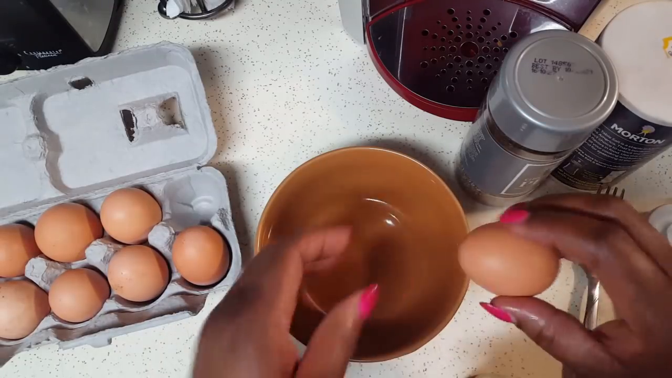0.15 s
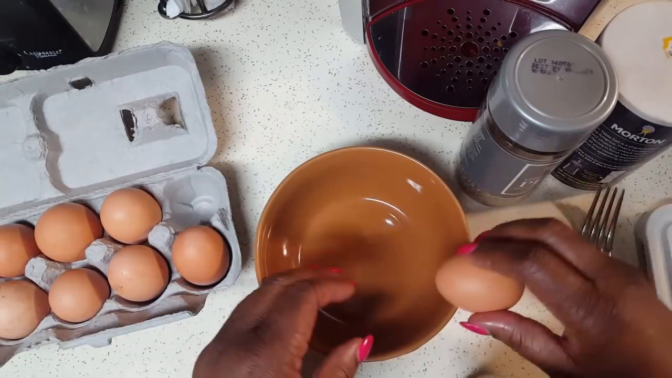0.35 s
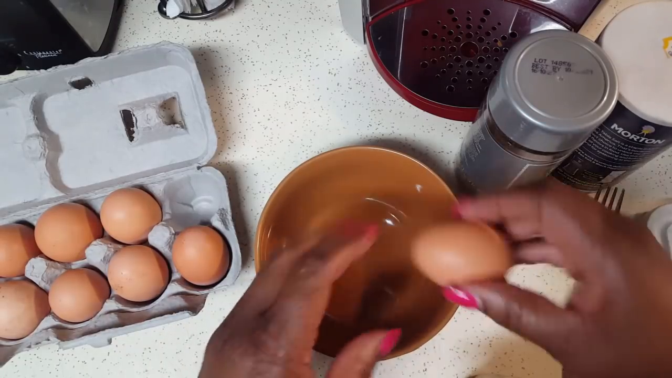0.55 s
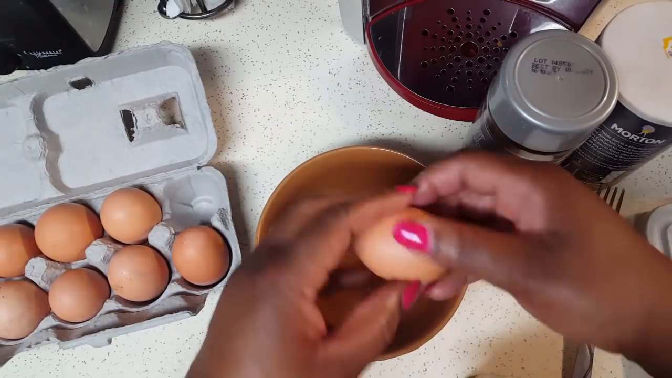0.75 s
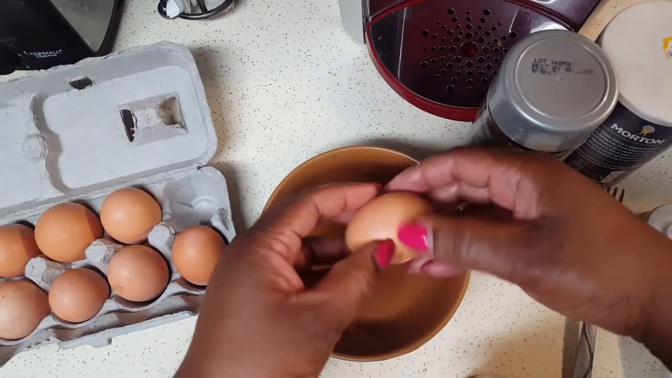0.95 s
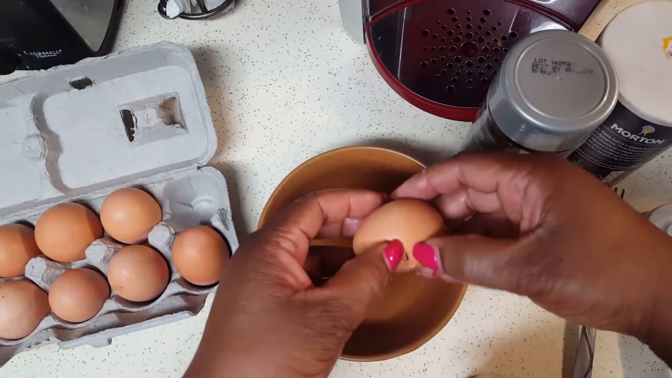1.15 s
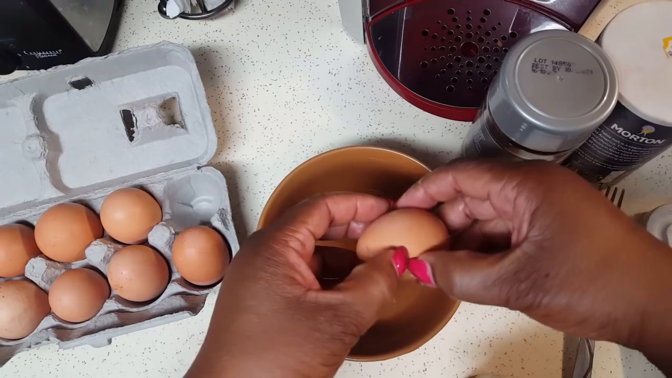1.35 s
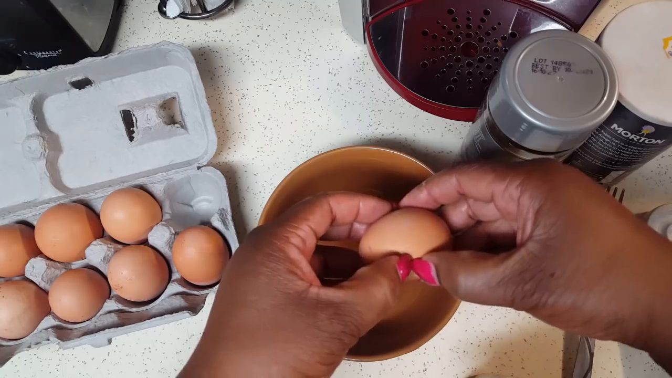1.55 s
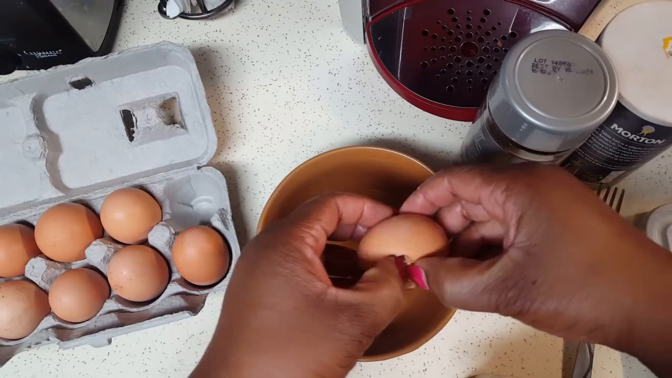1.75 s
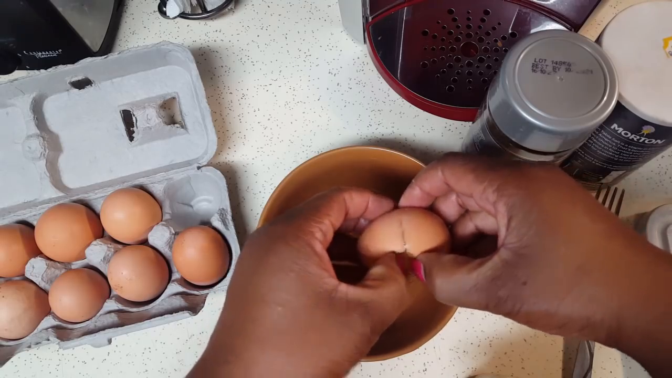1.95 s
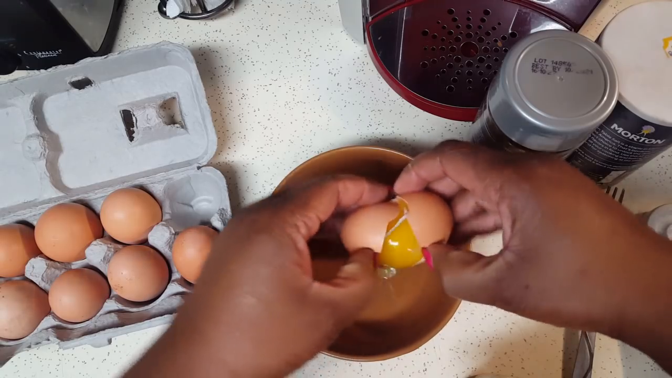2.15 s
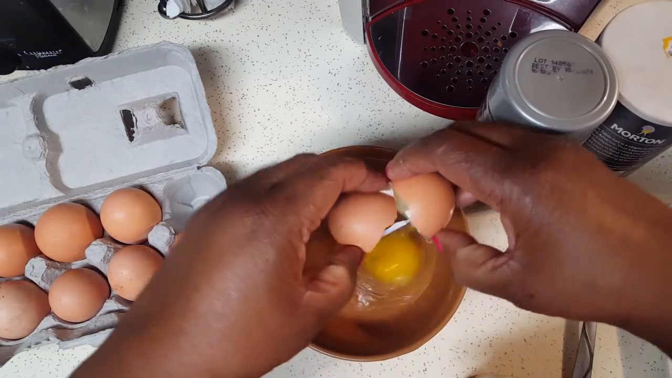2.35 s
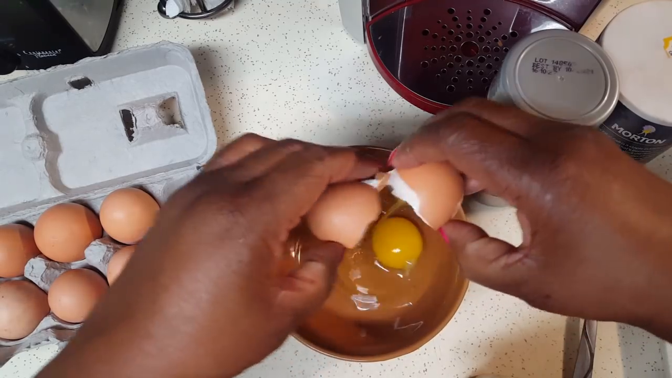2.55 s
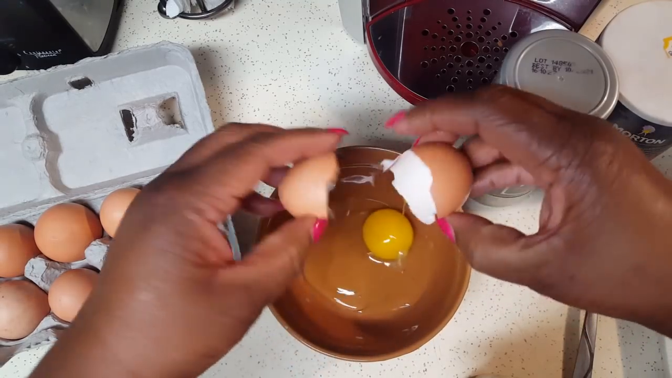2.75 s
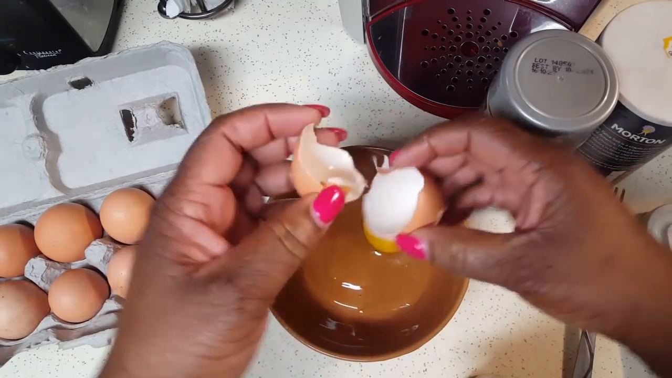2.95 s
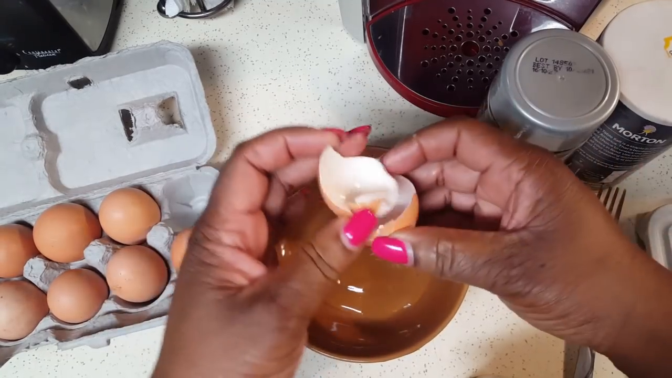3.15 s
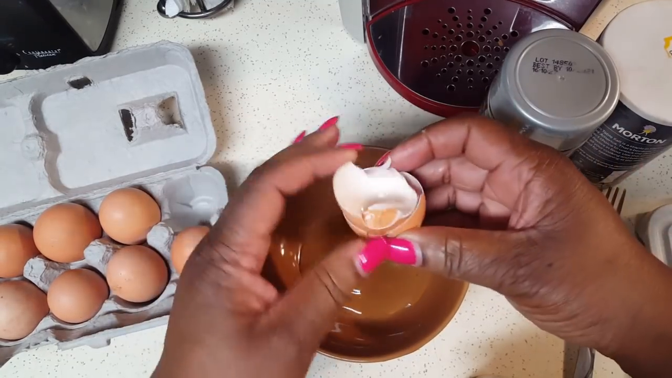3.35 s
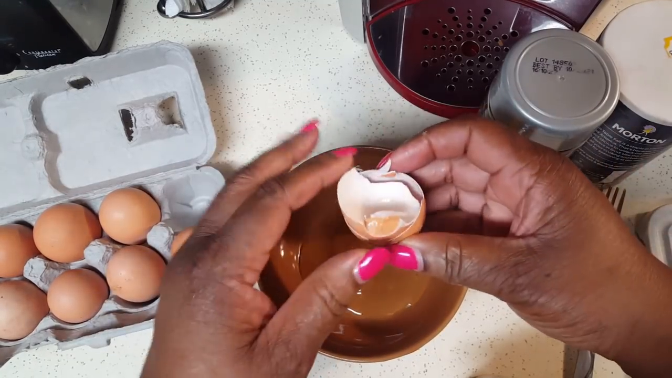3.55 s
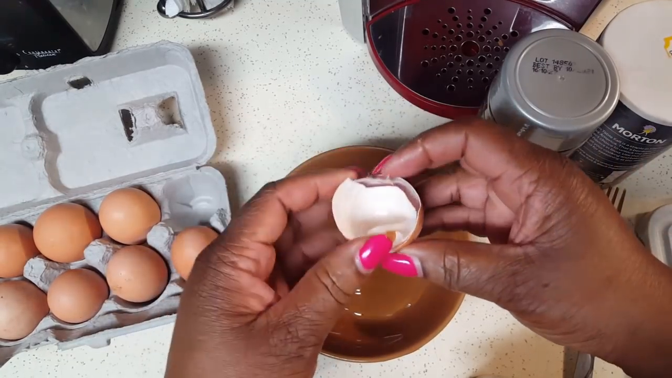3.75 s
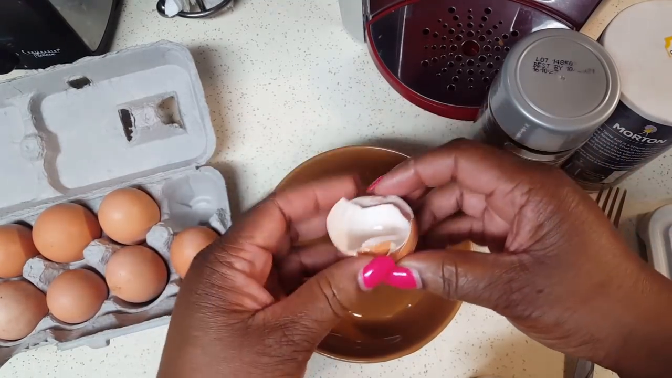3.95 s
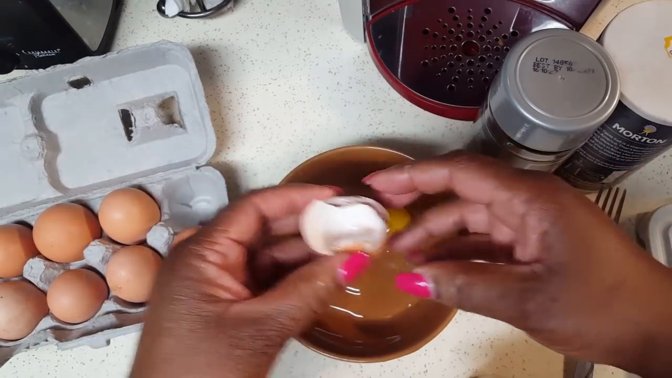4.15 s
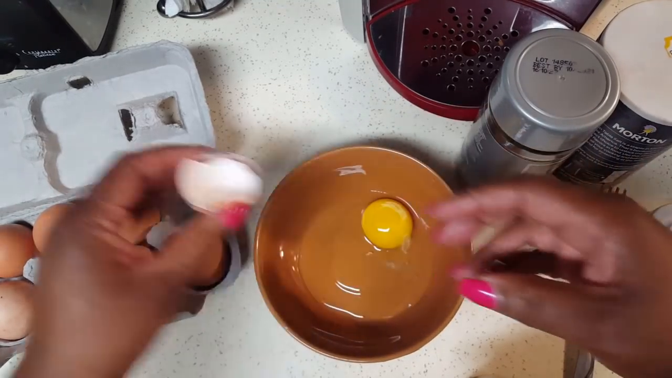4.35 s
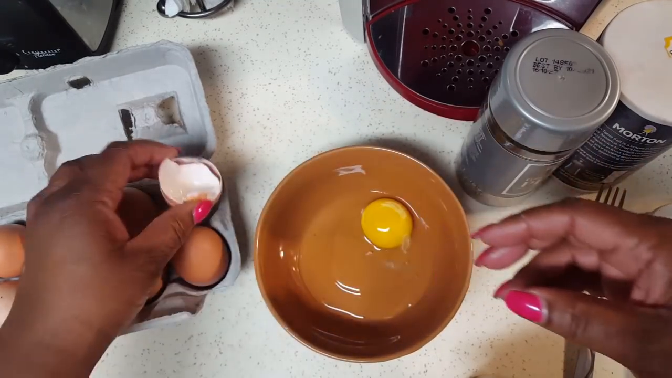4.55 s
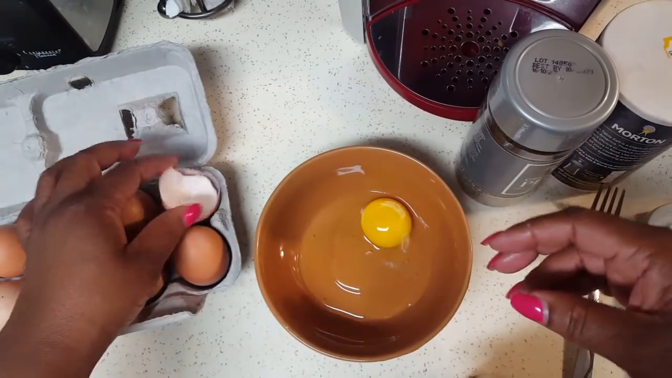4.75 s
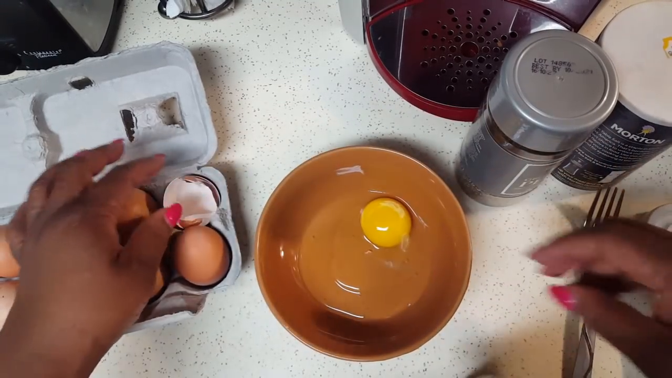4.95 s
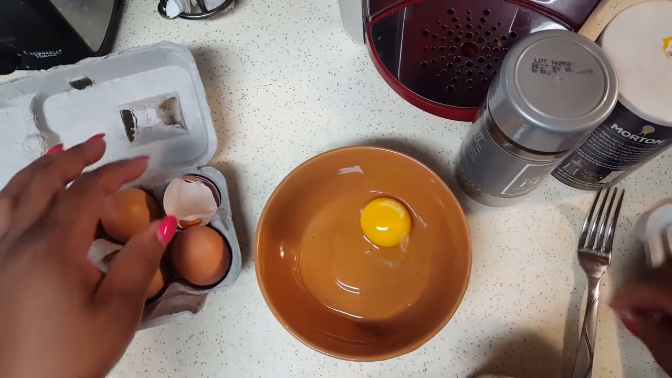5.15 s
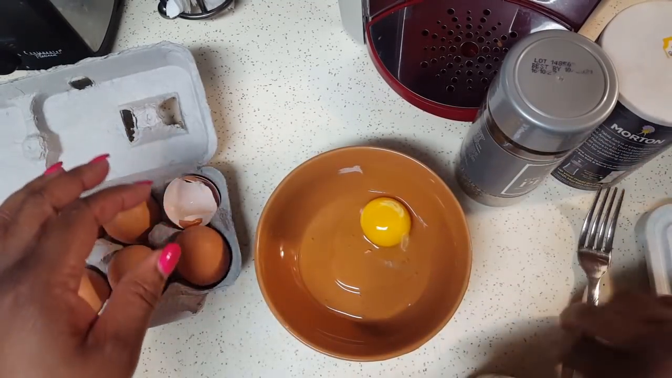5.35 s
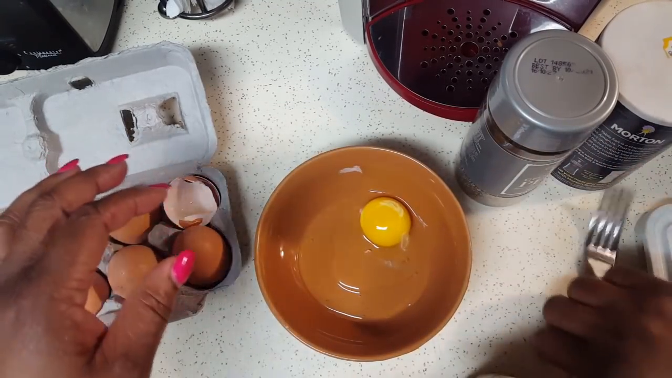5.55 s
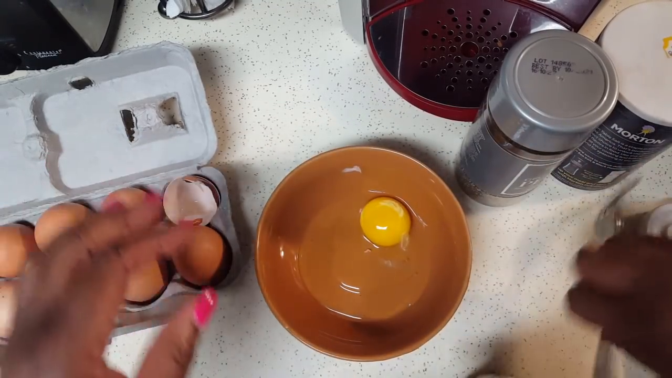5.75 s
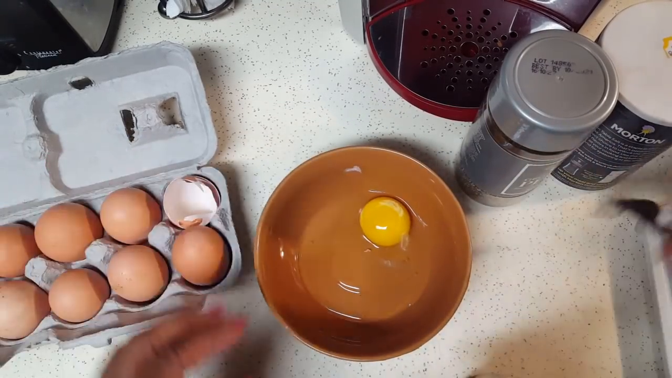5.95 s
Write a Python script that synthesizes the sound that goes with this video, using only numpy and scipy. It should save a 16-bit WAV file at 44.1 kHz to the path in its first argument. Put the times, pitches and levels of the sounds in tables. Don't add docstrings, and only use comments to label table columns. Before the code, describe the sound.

Close up in a small humming kitchen: egg knocked on a bowl, shell splitting, shells nested and dropped into a carton, fork jingling.

```python
import sys
import numpy as np
from scipy import signal
from scipy.fft import rfft, irfft, next_fast_len
from scipy.io import wavfile
from scipy.ndimage import uniform_filter1d, map_coordinates

SR = 44100
rng = np.random.default_rng(int(sys.argv[2]) if len(sys.argv) > 2 else 0)


def put_to_file(sound):
    columns = np.atleast_2d(sound).T
    safe = np.clip(columns, -1, 1)
    whole_steps = np.round(safe * 32767)
    wavfile.write(sys.argv[1], SR, whole_steps.astype(np.int16))


def natural_amplitude(level_db):
    exponent = np.asarray(level_db, float) / 20
    return 10 ** exponent


N = 265041


def evened(x):
    return x / np.sqrt(np.mean(x ** 2) + 1e-20)


def peaked(x):
    return x / np.max(abs(x))


def read(points, hz):
    f, value = np.transpose(points)
    return np.interp(np.log(hz + 1), np.log(f + 1), value)


def add(mix, s, sound):
    part = mix[..., round(s * SR):][..., :sound.shape[-1]]
    part += sound[..., :part.shape[-1]]


def resonate(x, hz, width):
    r = np.exp(-np.pi * width / SR)
    return signal.lfilter([1, 0, -1], [1, -2 * r * np.cos(2 * np.pi * hz / SR), r * r], x)


def band(x, lo_hz, hi_hz):
    return signal.sosfilt(signal.butter(2, [lo_hz, hi_hz], "band", fs=SR, output="sos"), x)


def grit(count, spread_db):
    sign, size = rng.standard_normal(count), rng.exponential(1, count)
    return sign * natural_amplitude(spread_db * np.minimum(size, 5))


def ring(modes, longest, flutter_db):
    t = np.arange(SR // 2) / SR
    flutter = uniform_filter1d(rng.standard_normal((len(modes), len(t))), 500)
    swing = [natural_amplitude(db - 60 * t / min(t60, longest)) * np.sin(2 * np.pi * hz * t) for hz, db, t60 in modes]
    return peaked(np.sum(swing * natural_amplitude(flutter_db * evened(flutter)), axis=0))


def snap(db, hz, treble_db, broad_db, crumble, cycles=17, swell=0.):
    count = 3000
    t = np.arange(count) / SR
    drive = peaked(grit(count, spread_db=-0.5) * np.exp(-t / max(crumble, 2e-4)))
    if swell:
        drive *= np.minimum(t / swell, 1) ** 2 * np.exp(np.minimum(t, swell) / crumble)
    else:
        drive[:2] += .7
    click = np.linalg.norm(drive) * (np.arange(count) == round(swell * SR))
    drive = np.array([drive, click])
    body = resonate(resonate(drive, hz, 1.82 * hz / cycles), hz, 0.73 * hz)

    def matched(x):
        return x / np.linalg.norm(x, axis=1)[:, None] * np.linalg.norm(peaked(x[0]))

    middle = matched(body) + natural_amplitude(broad_db) * matched(band(drive, 1200, 5600))
    treble = matched(band(drive, 5139, 14500))
    return natural_amplitude(db) * (middle / np.max(abs(middle[0])) + natural_amplitude(treble_db) * treble)


def stroke(rows):
    s, *columns = np.transpose(rows)
    t = np.arange(s[0], s[-1], 1 / SR)
    return s[0], signal.windows.tukey(len(t), .08), [np.interp(t, s, c) for c in columns]


# (frequency [Hz], density [dB per Hz])
AIR = [(15, -65), (34, -44), (40, -17), (58, -8.5), (92, -17), (114, -8.5), (209, -3.5), (296, -6.5),
       (320, -18.5), (356, 0.5), (386, -13), (517, -12), (674, -17), (730, -13.5), (1540, -28),
       (14500, -36.5), (14700, -60.5)]
# (frequency [Hz], likeness [0-1])
AIR_SAME = [(60, 0.92), (240, 0.833), (950, 0.29), (3770, 0.024), (15000, 0.067)]
# (frequency [Hz], left minus right [dB])
AIR_LEFT = [(60, 1.5), (950, 3), (15000, -0.5)]
# (frequency [Hz], level [dB])
HUM = [(59.2, -70.5), (118.4, -66.5), (215.3, -61), (258.4, -66.5), (296.1, -64.5), (355.3, -60.5),
       (414.5, -69), (473.7, -70), (522.2, -68.5), (888.2, -75.5)]


def air():
    frames, hz = N // 512 + 5, np.fft.rfftfreq(2048, 1 / SR)
    a, b, c, d = rng.standard_normal((frames, 1025, 4)).T
    same = np.clip(read(AIR_SAME, hz), -1, 1)[:, None]
    left, other = a + 1j * b, c + 1j * d
    z = np.array([left, same * left + np.sqrt(1 - same ** 2) * other])
    sides = np.array([.5, -.5])[:, None, None]
    z *= natural_amplitude(read(AIR, hz)[:, None] + read(AIR_LEFT, hz)[:, None] * sides)
    wash = natural_amplitude(-54.5) * evened(signal.istft(z, nperseg=2048, noverlap=1536)[1][:, :N])
    t = np.arange(N) / SR
    waver = uniform_filter1d(rng.standard_normal((len(HUM), N)), 6000)
    for (hum_hz, db), w in zip(HUM, waver):
        wash += natural_amplitude(db + 3 + 1.3 * evened(w)) * np.sin(2 * np.pi * (hum_hz * t + rng.random()))
    return wash


# (time [s], level [dB], relative treble [dB])
RUSTLE = [
    [(0.28, -78.5, 5), (0.35, -72.5, 12), (0.41, -82, 8)],
    [(1.04, -74.5, 3), (1.084, -56, -3), (1.11, -67, -4)],
    [(1.385, -68, -2), (1.409, -55.5, 10), (1.45, -75, -1)],
    [(4.775, -55, -18), (4.84, -55.5, -14), (4.94, -45, -13.5), (5.15, -72, -19)],
    [(4.868, -62, 0), (4.888, -45, -6), (4.92, -56, -6)],
    [(1.7, -61, 0), (1.84, -62.5, -3), (2.0, -73, -2)],
    [(5.52, -59.5, 5), (5.706, -60, -26), (5.74, -37, -12)],
    [(5.745, -44, 11), (5.79, -56, 7), (6.0, -65, 12)],
]


def rustles(near):
    for rows in RUSTLE:
        s, fade, (db, treble_db) = stroke(rows)
        drive = grit(len(db), spread_db=-0.5)
        fibres = evened(band(drive, 1050, 2665)) + natural_amplitude(treble_db) * evened(band(drive, 4480, 15000))
        add(near, s, natural_amplitude(db - 7) * fade * fibres)


# (frequency [Hz], width [Hz], level [dB])
COUNTER = [(108, 51.6, -7.5), (323, 59, 3), (570, 200, -5), (724, 48, -8), (880, 99, -12.5),
           (1120, 110, -6.5)]


def thud(db, t60, top_hz, low_hz=85):
    t = np.arange(SR // 2) / SR
    drive = rng.standard_normal(len(t)) * natural_amplitude(-60 * t / t60) * np.minimum(t / 0.00095, 1)
    modes = sum(natural_amplitude(level_db) * np.sqrt(width) * resonate(drive, hz, width) / hz
                for hz, width, level_db in COUNTER)
    boom = peaked(band(modes, low_hz, 1.17 * top_hz))
    rattle = peaked(band(drive, 229.6, top_hz))
    return natural_amplitude(db) * peaked(boom + natural_amplitude(-3) * rattle)


# (time [s], peak [dB])
BLOW = [
    (0.4536, -7),
    (0.4545, -3),
]
# (frequency [Hz], level [dB], t60 [s])
BOWL = [(1141, -17, .24), (1389, 0, .26), (1384, -10, .43), (1728, -23, .26), (2078, -26, .3),
        (3136, -13, .25), (3141, -22, .6), (5448, -28, .36), (556, -8, .25), (880, -9, .25),
        (917, -11, .22), (731, -12, .3), (5825, -29, .15)]


def blow(near, rim):
    (crackle_s, crackle_db), (land_s, land_db) = BLOW
    add(near, crackle_s, snap(crackle_db - 5.5, 3000, 9, 3, .0013))
    add(near, land_s, snap(land_db - 3, 1700, -9, -5, .0006, 9))
    add(near, land_s, thud(land_db - 5, 0.13, 1500, low_hz=150))
    bowl = natural_amplitude(land_db - 7) * ring(BOWL, longest=1, flutter_db=.6)
    add(near[1], land_s, natural_amplitude(-14) * bowl)
    add(rim, land_s, np.array([bowl, np.roll(bowl, 9)]))


# (time [s], peak [dB], ring [Hz], relative treble [dB])
SNAPS = [(0.8612, -38, 1460, -1.5), (.936, -51, 2477, -1), (1.431, -46, 1420, 9.5), (1.734, -41, 1340, -13),
         (1.774, -52, 2460, 9), (1.8503, -23, 1840, 6), (2.0, -43, 3440, 6), (2.2207, -43, 4690, 5),
         (2.3627, -23.5, 1910, -7.5), (2.372, -28.5, 2060, -19), (2.4293, -44, 1960, 7),
         (2.4524, -51.5, 1880, 16), (2.4573, -52, 2190, 14)]


def snaps(near):
    for s, *row in SNAPS:
        add(near, s, snap(*row, broad_db=4, crumble=0.0013, cycles=12))


# (time [s], peak [dB], ring [Hz], relative treble [dB], crumble [s])
PINGS = [(1.062, -54, 3580, -25, 0.013), (1.058, -51, 1970, 0, .005), (1.066, -46, 1900, -12.7, 0.0052),
         (1.08, -48, 3620, -25, .008), (1.082, -41.5, 1910, -16, 0.006), (1.096, -54, 1950, -15, .0015),
         (1.2146, -43, 1850, -19, 0.00085), (2.134, -27, 3220, 1, .0007), (2.151, -25.5, 2770, -22, .0006),
         (2.27, -25.5, 2060, -18, 0.012), (2.2785, -13, 1800, -16, 0.002),
         (2.2945, -24.5, 1950, -17, .0009), (2.333, -27.5, 1850, -13, .002),
         (2.5037, -31.5, 3210, -4.5, 0.0022), (2.534, -37, 1940, -8, 0.00072),
         (2.6287, -36.5, 2010, 9, 0.0017)]


def pings(near):
    whole_until_s = 2
    for s, db, hz, treble_db, crumble in PINGS:
        bare_db, cycles = (-14, 26) if s < whole_until_s else (-7.5, 16)
        add(near, s, snap(db, hz, treble_db, bare_db, crumble, cycles))


# (time [s], peak [dB], relative treble [dB], crumble [s])
SPLINTERS = [(1.1826, -38, 2, 0.00066), (1.399, -45.5, -18, 0.0045), (1.408, -40, -3, .0015),
             (1.424, -43, -3, 0.002), (1.508, -33.5, 0, 0.0011), (1.724, -45.5, -3, 0.0044),
             (1.73, -46.5, 8.5, 0.0057), (1.761, -46, -14, .0017), (1.787, -42, 1, .0011),
             (1.803, -46, 12, 0.0035), (1.809, -39, -4, .001), (1.8454, -26, -24, 0.0093),
             (1.91, -40.5, -6, 0.0017), (1.935, -42, 2, .001), (1.9897, -42.5, -0.5, 0.0026),
             (2.173, -47, 2, .0031), (2.231, -40, -14, .0017), (2.443, -37, -1, 0.0011),
             (2.553, -33.5, -4, 0.00073), (2.562, -31, 0.5, 0.0023), (2.657, -41, -3, 0.0083),
             (2.69, -37, 4, 0.0038), (2.7676, -50, -10, .0022), (2.825, -52.5, 11, 0.00079),
             (2.9655, -48.5, 4.5, 0.0043)]


def splinters(near):
    for s, db, treble_db, crumble in SPLINTERS:
        add(near, s, snap(db, 1780, treble_db, broad_db=19, crumble=crumble))


# (time [s], peak [dB], ring [Hz], crumble [s])
CHIPS = [(2.103, -42, 5030, 0.0023), (2.115, -33, 8000, 0.003), (2.137, -39, 8000, .002),
         (2.365, -39.5, 3300, 0.0033), (1.7375, -47, 4400, 0.0035), (1.998, -46, 9000, .002),
         (1.99, -48, 9000, .002), (1.897, -50, 8000, .002), (1.8515, -30, 12500, .003),
         (2.266, -42, 1900, .001), (2.2705, -46, 9000, .003), (2.278, -47, 9900, 0.0016),
         (2.363, -41, 7250, 0.0026), (2.429, -42, 9500, .0015), (2.4525, -49, 6500, 0.00092),
         (2.457, -42, 10600, 0.0022), (2.463, -52, 10000, .002), (2.284, -31, 3130, .005),
         (2.548, -38, 2600, 0.0032), (2.58, -46, 7200, .001), (2.628, -32, 9500, .002),
         (2.693, -46, 11500, .002), (3.665, -50, 3160, 0.0085), (4.778, -39, 650, .005),
         (3.935, -57, 8000, .003), (3.95, -53, 1690, .003), (4.728, -48, 5000, .0015),
         (4.7366, -34.5, 6030, 0.00093), (4.7425, -45, 5500, 0.0014), (4.744, -44, 10500, .0015),
         (4.753, -54, 5000, .001), (4.7765, -48, 6000, .002), (4.874, -51, 11000, .006),
         (4.8872, -44, 11000, .002), (4.889, -44, 6000, 0.0018), (4.904, -50, 6000, .003),
         (4.9244, -29.5, 4440, 0.0017), (4.9322, -28.5, 10900, 0.00044), (4.945, -49, 4520, .004),
         (5.512, -43.5, 6100, 0.0022), (5.519, -37, 5500, 0.0019), (5.591, -53, 11000, .002),
         (5.627, -49, 9400, 0.0052), (5.63, -52, 7500, .005), (4.786, -39, 480, 0.005),
         (2.495, -50, 4000, 0.0018), (5.718, -48, 2550, .008), (5.734, -46, 2600, 0.0047)]


def chips(near):
    for s, db, hz, crumble in CHIPS:
        add(near, s, snap(db, hz, -35, -15, crumble, cycles=6.6))


# (time [s], peak [dB], ring [Hz], relative treble [dB], relative bare [dB],
# crumble [s], ring [cycles])
SPLIT = (2.1124, -12.5, 5050, -3, -1, .0018, 6)


def split(near):
    s, *row = SPLIT
    add(near, s, snap(*row))


# (frequency [Hz], width [Hz])
CAVITY = [(1760, 290), (3050, 320)]
# (time [s], cavity [dB], relative second mode [dB], relative hiss [dB])
RUBS = [
    [(2.272, -48, -4, -19), (2.32, -49, -8, -13), (2.42, -59.5, -15, 0)],
    [(3.29, -37.5, -5, -8), (3.328, -40, -10, -13), (3.42, -61, -23, -17)],
    [(3.43, -63, 13, 2), (3.498, -30, -10, -10.5), (3.62, -80, -10, -20)],
    [(3.64, -75.5, -8.5, -5), (4.174, -67, -7, -12), (4.27, -84, -13, -12)],
]


def rubs(near):
    (hz, width), (upper_hz, upper_width) = CAVITY
    for rows in RUBS:
        s, fade, (db, second_db, hiss_db) = stroke(rows)
        clumps = natural_amplitude(2 * evened(uniform_filter1d(rng.standard_normal(len(db)), 160)))
        drive = grit(len(db), spread_db=5) * clumps
        cavity = evened(resonate(drive, hz, width))
        cavity += natural_amplitude(second_db) * evened(resonate(drive, upper_hz, upper_width))
        hiss = evened(band(drive, 2900, 14000))
        add(near, s, natural_amplitude(db - 3) * fade * (cavity + natural_amplitude(hiss_db) * hiss))


# (frequency [Hz], level [dB], t60 [s])
FLAKE = [(3250, -2, .12), (4100, -9, .08), (7120, -13, .12)]


def flake(near):
    add(near, 2.504, natural_amplitude(-43.5) * ring(FLAKE, longest=1, flutter_db=1.7))


# (time [s], frequency [Hz])
CUP = [(3.16, 1830), (3.3, 1756), (3.6, 1670), (4.3, 1645)]


def tick(s, db, treble_db, second_db, crumble, swell=0.):
    cup_hz, upper_hz = np.interp(s, *np.transpose(CUP)), CAVITY[1][0]
    upper = snap(db + second_db, upper_hz, -31, -34, crumble, 22, swell)
    upper += snap(db + second_db - 14, 5250, -30, -25, crumble, 18, swell)
    return snap(db, cup_hz, treble_db, -18, crumble, 23, swell) + upper


# (time [s], peak [dB], relative treble [dB], relative second mode [dB])
TICKS = [(3.163, -44, -5, -22), (3.2702, -46, -2, 1.5), (3.288, -27, -6, -7.5), (3.296, -33, -12, -2),
         (3.3124, -38, -4.5, -13.5), (3.3155, -29, -12, -5), (3.3348, -33, -15, -21.5),
         (3.3564, -34.5, -7.8, -18), (3.4153, -39.5, -9, -10), (3.446, -40, -5, -10.5),
         (3.4703, -33, 5.5, 0), (3.491, -24, -1.5, -7), (3.4957, -18.5, -6.5, -11), (3.508, -23, -16, -19),
         (3.526, -35, -10, -13), (3.542, -29.5, -8, -12), (3.548, -33.5, -14.8, -9), (3.688, -44.5, -4, 0),
         (3.7, -40, -8, -5), (3.7065, -39.5, -15.7, -10), (3.77, -39.5, -17, -18), (3.885, -44, -11.5, -6),
         (3.895, -43, 1.5, -3.5), (4.2812, -68.5, 20, -1)]


def ticks(near):
    for s, *row in TICKS:
        add(near, s, tick(s, *row, crumble=0.0027))


# (time [s], peak [dB], relative treble [dB], relative second mode [dB], swell [s])
SCUFFS = [(4.024, -57, -11.5, 3.5, .012), (4.032, -54, -20, -15, 0.0028), (4.088, -60, -12, 1, .006),
          (4.097, -50, -20, -14, 0.0033), (4.13, -37, -14, -10, 0.0032), (4.148, -32, -12, -8, .003),
          (4.154, -30.5, -7.5, -3, 0.0029), (4.159, -34, -6.5, -2, 0.0032), (4.166, -45, -14, -4, 0.0021),
          (4.185, -53, -14, -5, 0.0035), (4.208, -44, -18, -13, 0.0045), (3.436, -46, -6, 3, 0.0071),
          (3.303, -34, -10, -7, 0.0047), (3.331, -34, -13, -16, 0.0043), (3.484, -34, -6, -5, .004),
          (3.518, -39, -10, -5, 0.0045)]


def scuffs(near):
    for s, db, treble_db, second_db, swell in SCUFFS:
        add(near, s, tick(s, db, treble_db, second_db, .0025, swell))


# (time [s], peak [dB], ring [Hz], relative treble [dB], relative unrung mid [dB])
KNOCKS = [(4.7365, -33, 4700, -6, 6), (4.7414, -39, 2720, 3, -3), (4.753, -39, 4700, -5, 15),
          (4.7765, -30, 990, -22, -14), (4.781, -33.5, 1710, -16, -18), (4.8774, -38, 920, -12, -2.5),
          (4.8865, -31, 2720, -8, -12), (4.9156, -30.5, 1340, -22, -11), (4.924, -28, 774, 0.5, 3),
          (4.9332, -27, 840, -9, 2), (4.9493, -36, 1460, -16, -5)]


def knocks(near):
    for s, *row in KNOCKS:
        add(near, s, snap(*row, crumble=0.0055, cycles=13))


# (time [s], peak [dB], t60 [s], top [Hz], bottom [Hz])
THUDS = [
    (4.923, -28, 0.095, 1000, 90),
    (5.515, -29.5, 0.12, 700, 70),
    (5.743, -32, 0.16, 970, 120),
    (5.918, -23.5, 0.08, 600, 105),
]


def thuds(near):
    for s, *row in THUDS:
        add(near, s, thud(*row))


# (time [s], peak [dB], ring [Hz], relative treble [dB],
# relative unrung mid [dB])
TAPS = [
    (5.5165, -35, 830, 0, 2),
    (5.6278, -43, 1090, -4, -3.5),
    (5.688, -50, 1790, -8, -4.3),
    (5.7265, -43, 2630, -12, -10),
    (5.7425, -17, 1920, 3, 21),
    (5.752, -25, 4680, 2, -6),
    (5.7618, -28, 5900, 0, 3),
    (5.814, -35, 3180, 7, 0),
    (5.9185, -23.5, 2600, -4, 7),
]


def taps(near):
    for s, *row in TAPS:
        add(near, s, snap(*row, crumble=0.0056, cycles=13))


# (frequency [Hz], level [dB], t60 [s])
FORK = [
    [(3230, -11, 0.1), (4690, -13, 0.07), (5830, -5, 0.12), (7430, 0, 0.091), (9420, -10, .12),
     (9800, -19, 0.1), (8100, -12, 0.1), (10750, -30, 0.24), (11410, -0.5, 0.12), (12200, -30, 0.29),
     (12700, -28, 0.12), (13400, -25, 0.72), (13620, -15, 0.09), (14000, -20, 0.11)],
    [(3170, -10, 0.081), (6550, -18, 0.3), (4680, -7, 0.1), (5650, -21, 0.35), (7160, -3, 5.0),
     (7424, -8, 0.47), (8350, -12, 5.0), (9000, -16, 0.14), (9500, -12, 0.62), (10770, -21, 0.94),
     (11500, -4, 0.26), (13200, -18, 0.49), (13740, 2, 0.17), (14450, -11, 0.15)],
]
LIFTED_HZ = [2540, 3440, 4004, 4683, 5811, 6377, 7116, 8094, 9400, 11405, 13205, 14443]
# (level [dB], t60 [s])
LIFTED = [(-2, 0.051), (-18, 0.088), (-19, .8), (-17, .09), (-28, .3), (-26, .7), (-20, 1.5), (-9.5, .22),
          (-7, .04), (-15, .14), (-19, .13), (-17, .2)]
# (time [s], peak [dB], grip [index])
CLINKS = [
    (5.7425, -14.5, 0),
    (5.7555, -32, 1),
    (5.8125, -39, 1),
    (5.9178, -23.5, 2),
    (5.8765, -48, 0),
    (5.831, -48, 0),
]


def clinks(near):
    lifted = [(hz, *row) for hz, row in zip(LIFTED_HZ, LIFTED)]
    grips = FORK + [lifted]
    for s, db, grip in CLINKS:
        levels = natural_amplitude(db + np.array([[0], [-7]]))
        add(near, s, levels * ring(grips[round(grip)], longest=.5, flutter_db=2))


# (time [s], level [dB])
JINGLE = [
    (5.744, -36),
    (5.78, -46),
    (5.81, -48),
    (5.82, -47),
    (5.875, -51),
    (5.9, -48),
    (5.915, -67),
]


def jingle(near):
    s, fade, (db,) = stroke(JINGLE)
    contacts = grit(len(db), spread_db=4) * (rng.random(len(db)) < 900 / SR)
    tines = ring(FORK[0] + FORK[1], longest=0.025, flutter_db=2.7)
    add(near, s, natural_amplitude(db) * fade * evened(signal.fftconvolve(contacts, tines)[:len(db)]))


# (frequency [Hz], t60 [s])
ROOM = [(100, 0.3), (500, 0.41), (1500, 0.31), (4000, 0.34), (9000, 0.31), (15000, 0.2)]


def kitchen(x):
    taps = np.zeros((2, SR // 2))
    at = np.arange(100, SR // 2 - 20, 20) + rng.integers(0, 20, (2, (SR // 2 - 101) // 20))
    np.put_along_axis(taps, at, rng.choice([-1., 1.], at.shape), 1)
    hz, t, (mid, side) = signal.stft(taps, SR, nperseg=256)
    side = side * (hz / np.hypot(hz, 900))[:, None]
    z = np.array([mid + side, mid - side]) * natural_amplitude(-60 * t / read(ROOM, hz)[:, None])
    tail = signal.istft(z, SR, nperseg=256)[1]
    return signal.fftconvolve(x[None], tail / np.linalg.norm(tail[0]), axes=1)[:, :N]


# (frequency [Hz], phase [rad])
PORT_TURN = [(300, 0.11), (800, 0.67), (1400, 1.4), (2400, 1.13), (4400, 0.57), (8000, 1.2), (14000, 1.98)]
# (frequency [Hz], left minus right [dB])
PORT_LEFT = [(200, -2), (1500, 4), (5000, 6.5), (14000, 7)]
# (left delay [s], right delay [s], level [dB])
ECHOES = [(.0009, 0.001093, -18), (.0023, .0019, -12.5), (.0041, .0047, -13.5)]


def ports(x):
    size = next_fast_len(N)
    hz = np.fft.rfftfreq(size, 1 / SR)
    half = natural_amplitude(read(PORT_LEFT, hz) / 2) * np.exp(.5j * read(PORT_TURN, hz))
    echoes = 1
    for left, right, db in ECHOES:
        echoes = echoes + natural_amplitude(db) * np.exp(-2j * np.pi * hz * np.array([[left], [right]]))
    return irfft(rfft(x, size) * np.array([half, 1 / half]) * echoes, size)[:, :N]


# (time [s], left port lag [samples], room send [dB], extra left minus right [dB])
PLACE = [(0.3, 1.5, 1.5, 0.5), (0.8, 3, 0, -1), (1.0, 0, -3, -0.5), (2.05, -.5, -2.5, -3),
         (2.4, 0.15, -2.5, 0), (2.9, -0.7, -2, 0), (3.2, -0.15, -1.5, -0.5), (3.6, 0.2, -4.5, -0.5),
         (4.0, -0.4, -7, -1), (4.4, -0.4, -5, 1), (4.65, -3.5, -2, 5), (5.2, -5, -2, 0),
         (5.45, 2, -0.5, -2), (5.64, 1.5, -0.5, -2), (5.7, 4.5, -1, -0.5), (6.0, 4.5, -1, -1.5)]


def place_hands(near):
    s, *place = np.transpose(PLACE)
    lag, send_db, pan_db = (np.interp(np.arange(N) / SR, s, c) for c in place)
    left, right = ports(near[0])
    left = map_coordinates(left, [np.arange(N) - lag], order=3)
    direct = np.array([left, right]) * natural_amplitude(np.outer([.5, -.5], pan_db))
    return direct + natural_amplitude(-6) * kitchen(near[1] * natural_amplitude(send_db))


def scene():
    near, rim = np.zeros((2, 2, N))
    rustles(near)
    blow(near, rim)
    for source in (snaps, pings, splinters, chips, split, rubs, flake, ticks, scuffs,
                   knocks, thuds, taps, clinks, jingle):
        source(near)
    return place_hands(near) + rim + air()


def roll_off(x):
    return signal.sosfilt(signal.butter(12, 16810, fs=SR, output="sos"), x)


def record(dry):
    size = next_fast_len(N)
    hz = np.fft.rfftfreq(size, 1 / SR)
    edge_hz = 14550
    corners = [edge_hz, edge_hz + 100, edge_hz + 2150, edge_hz + 2250]
    shelf = natural_amplitude(np.interp(hz, corners, [0, -22, -24, -90]))
    mix = irfft(rfft(dry, size) * shelf, size)[:, :N]
    return roll_off(mix)


dry = scene()
out = record(dry)
put_to_file(out)
```